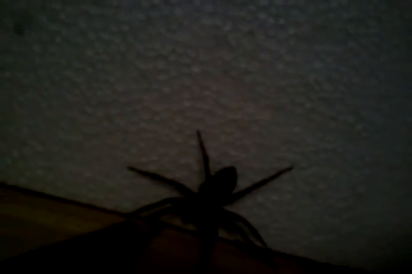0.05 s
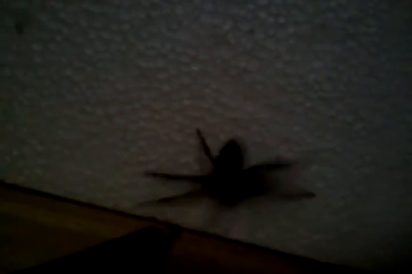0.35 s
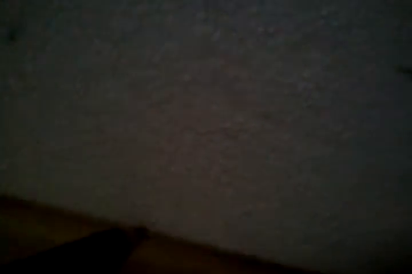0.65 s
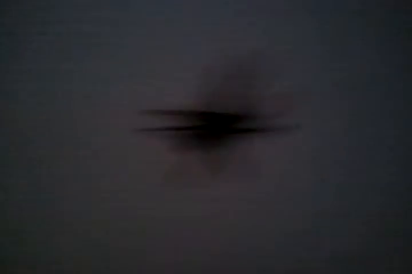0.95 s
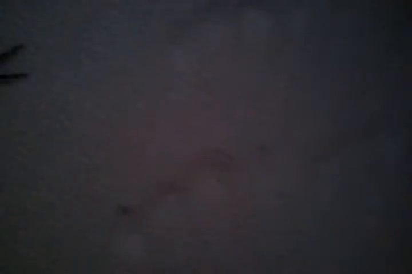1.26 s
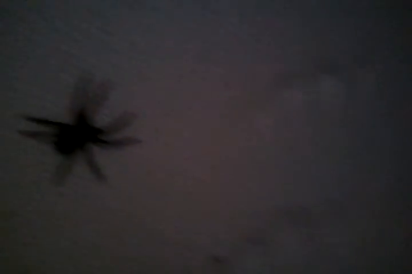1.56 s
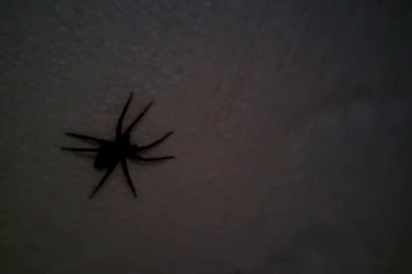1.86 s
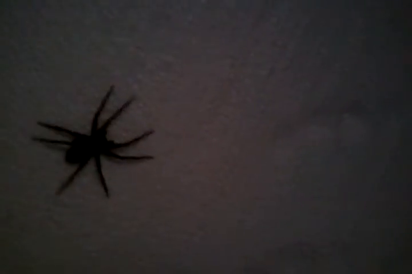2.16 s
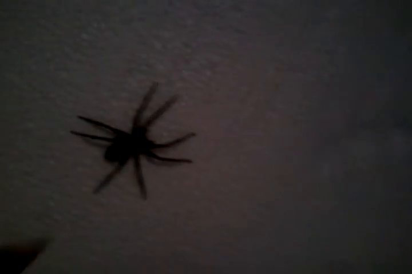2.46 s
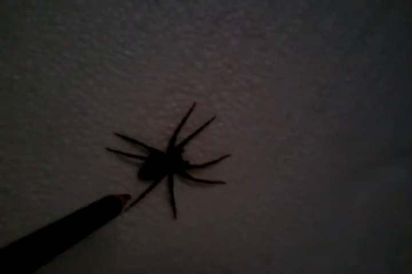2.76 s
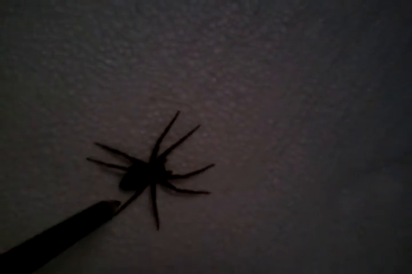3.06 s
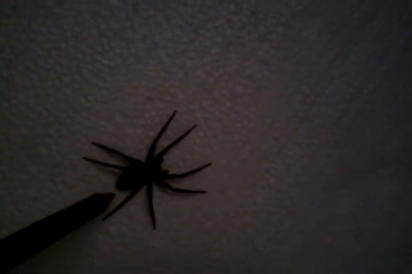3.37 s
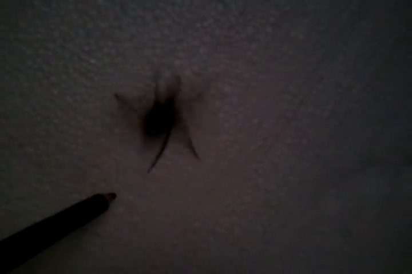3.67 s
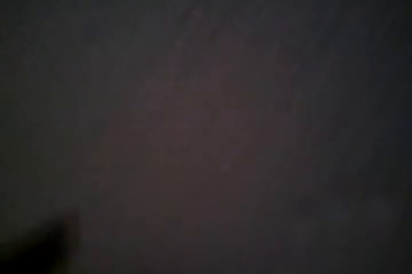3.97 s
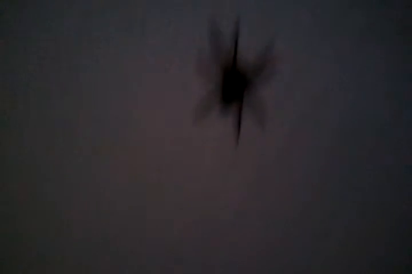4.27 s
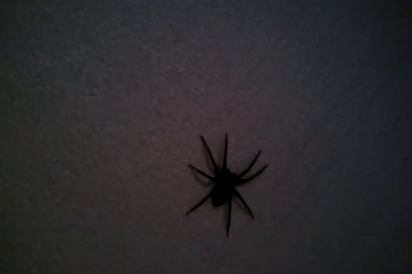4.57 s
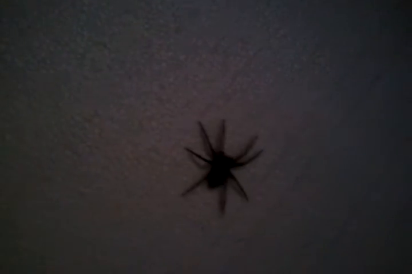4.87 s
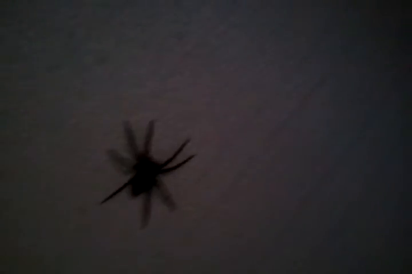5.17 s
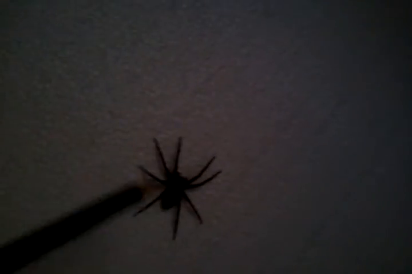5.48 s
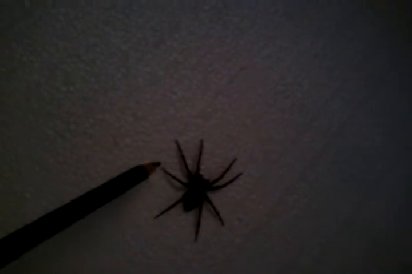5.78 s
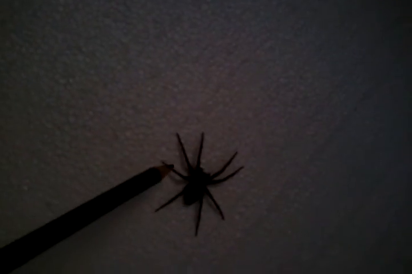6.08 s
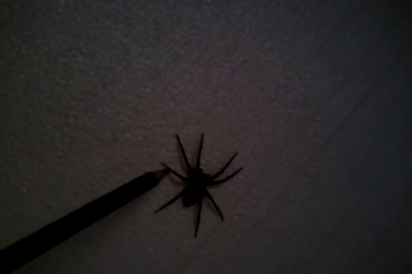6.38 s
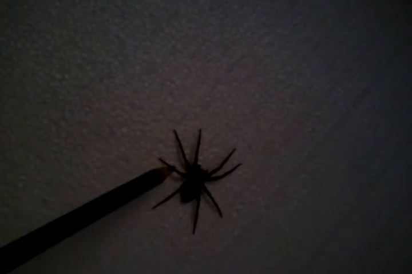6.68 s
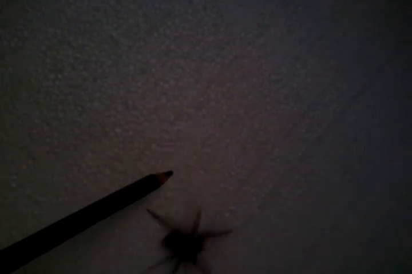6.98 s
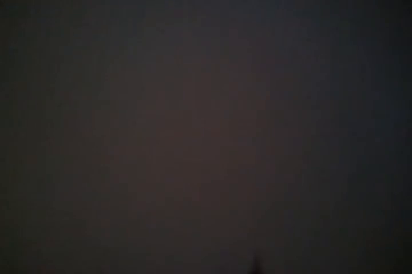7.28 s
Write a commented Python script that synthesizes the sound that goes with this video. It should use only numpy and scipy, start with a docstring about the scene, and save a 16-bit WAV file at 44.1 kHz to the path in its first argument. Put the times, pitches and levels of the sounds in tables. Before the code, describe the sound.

Faint ticking and scraping of a spider dashing over a papered wall three times, between soft microphone knocks, sleeve rustle and hiss.

```python
"""A quiet room rumbles under steady microphone hiss, and a hand-held camera clicks softly.
At 0.6 s a large spider, prodded with a pencil, dashes over textured wallpaper: its claws tick and
scrape, and the paper rings faintly. Fingers bump the camera and a sleeve rustles as the arm moves.
A second dash comes at 3.9 s, followed by more rustle and low bumps. The third starts at 7.1 s
and ends among camera knocks and a brief swell of the room."""
import sys
import numpy as np
from scipy import signal
from scipy.fft import rfft, irfft, next_fast_len
from scipy.io import wavfile

SR = 44100
rng = np.random.default_rng(int(sys.argv[2]) if len(sys.argv) > 2 else 0)


def master_out(mix):
    """Clip the mix to full scale and print it as 16-bit PCM to the path in sys.argv[1]."""
    frames = np.transpose(np.atleast_2d(mix))
    ceiling = np.clip(frames, -1, 1)
    pcm = np.round(ceiling * 32767).astype(np.int16)
    wavfile.write(sys.argv[1], SR, pcm)


N = 332073

# Tone of the room's rumble, its air and the microphone's hiss: frequency_hz, gain_db
RUMBLE_EQ = [(10, -30), (18, -3), (28, 1.5), (45, -1.5), (70, -1), (100, -4), (150, -9), (260, -26),
             (500, -65)]
AIR_EQ = [(60, -6.5), (140, 1), (250, 0.5), (500, -4.5), (1000, -9), (2000, -12.5), (4000, -23.5)]
HISS_EQ = [(100, -2.5), (800, 2.5), (1900, -1.5), (2300, -1.1), (3000, 0.5), (4300, 0), (5500, 0),
           (7000, -0.5), (8500, 1)]
# Gentle swells of rumble and air: middle_s, half_length_s, rise_db
ROOM_SWELLS = [(1.2, .3, 2.5), (2.594, 0.32, 1.5), (4.4, 1.5, 1), (7.5, 0.13, 4)]
# Bumps and clicks of the camera body: start_s, level_db, pitch_hz, t60_s
CAMERA_BUMPS = [(.432, -52, 1530, 0.043), (0.4815, -46, 1510, .05), (.602, -45, 930, 0.022),
                (1.611, -33.5, 64, 0.18), (1.617, -36.5, 151, 0.069), (2.270, -46.5, 129, 0.075),
                (2.274, -42, 347, 0.039), (2.276, -49, 910, .03), (2.6495, -42.5, 835, 0.034),
                (2.650, -51, 1250, 0.023), (5.235, -41.5, 47.6, 0.27), (5.44, -43, 45, 0.4),
                (6.035, -39, 60, 0.12), (7.392, -44, 74, 0.23), (7.432, -37.5, 1091, 0.035),
                (7.433, -42, 640, .035), (7.437, -35.5, 159, 0.093)]
# Firm footfalls: start_s, level_db, scrape_s
FIRM_STEPS = [(.585, -46, .002), (.614, -37.5, 0.0022), (.617, -37.5, .002), (.627, -36.5, .0042),
              (0.633, -34.5, 0.0028), (0.679, -40.5, 0.0021), (.708, -43.5, 0.0036), (.727, -43, 0.0027),
              (.740, -46, .002), (.748, -41.5, .0034), (.770, -45, .0036), (.797, -44, .003),
              (.808, -43, 0.0027), (.812, -37, 0.0023), (0.838, -41, 0.0065), (.844, -41, .003),
              (.865, -42, .002), (.869, -34.5, 0.0017), (0.879, -41, 0.0086), (.900, -41, .0025),
              (0.908, -43.5, .005), (.947, -42, .008), (.974, -41.5, 0.0034), (.981, -36, .0028),
              (.997, -35, 0.0018), (1.0006, -31, .002), (1.0089, -29.5, 0.0019), (1.027, -42.5, 0.0024),
              (1.040, -49, .0035), (1.072, -47, 0.0046), (1.081, -47.5, 0.0086), (1.095, -46, 0.0021),
              (2.258, -47.5, 0.0023), (2.287, -47.5, .002), (3.908, -46, 0.0029), (3.926, -42, 0.0022),
              (3.985, -48, 0.0018), (3.997, -42, 0.0031), (4.032, -47, 0.0029), (4.056, -46, 0.0037),
              (4.094, -39.5, 0.0016), (4.175, -45.5, 0.0026), (4.203, -48, .0018), (4.208, -42, 0.0018),
              (4.273, -47, .0015), (4.328, -47.5, 0.0016), (7.167, -45.5, 0.0063), (7.189, -45.5, 0.007),
              (7.203, -42.5, 0.0043), (7.234, -45, 0.0016), (7.252, -37.5, 0.0013), (7.262, -48, 0.0046),
              (7.275, -43, 0.0015), (7.370, -45, 0.0017), (7.414, -45.5, 0.014), (7.444, -42, .007),
              (7.464, -42, 0.0046), (7.488, -39, 0.0036), (7.518, -45.5, 0.0036)]
# Runs of light leg touches, each on its own patch of wall; the first two make one dash:
# start_s, end_s, touch_level_db, scrape_s, paper_ring_db, wall_tap_db
RUNS = [(.6, 0.798, -52, .003, -12, -11), (0.804, 1.107, -51, .004, -7, -5),
        (3.88, 4.379, -53.5, 0.0029, -2, -7.5), (7.134, 7.53, -51.5, 0.0066, -2, -5.5)]
# Bright tone of a claw on the grain: frequency_hz, gain_db
CLAW_EQ = [(300, -11), (700, -6), (1700, -13.5), (2600, 0), (3400, -1), (4200, -0.5), (5600, -1.5),
           (7200, 0.5), (8200, 0.5), (10000, 6)]
# Resonances of the ringing paper and the dull wall behind it: pitch_hz, width_hz, gain_db
PAPER_MODES = [(2360, 520, 3), (2840, 670, -2), (4410, 300, -7.5), (6600, 270, -2)]
WALL_MODES = [(743, 310, -2.5), (1100, 190, 0.5), (1480, 300, 2), (2360, 400, -4.5)]
# Strokes of the sleeve: middle_s, half_length_s, level_db
SLEEVE_STROKES = [(1.613, 0.0073, -52.5), (2.276, .04, -62), (2.7, 0.18, -68), (4.404, 0.27, -61.5),
                  (5.52, 0.21, -56.5)]
# Tone of sliding cloth: frequency_hz, gain_db
CLOTH_EQ = [(150, -6), (350, -0.5), (800, 5), (1300, 0), (2200, -2.5), (4000, -2), (6000, -1.5),
            (8500, -5.5)]
# Treble roll-off of the camera's microphone: frequency_hz, gain_db
MIC_EQ = [(7400, 0.5), (7800, -3.5), (8200, -8.5), (8500, -17), (8800, -27.5), (9100, -45.5)]

TOP_HZ = 9150  # hard high cut
TOUCHES_PER_S = 70  # light touches of all eight legs
RING_LOSS_DB, CLEAN_TAP_S = 5, .0024  # paper ring lost per doubling of a scrape beyond a clean tap


def amp(db):
    """Decibels to gain."""
    return 10 ** (np.asarray(db) / 20)


def unit(x):
    """Scale to rms 1."""
    return x / np.sqrt(np.mean(np.abs(x) ** 2) + 1e-20)


def eq_gain(curve, hz):
    """Gain of an EQ curve, its points joined on a log frequency axis."""
    points_hz, db = np.transpose(curve)
    return amp(np.interp(np.log(hz + 1), np.log(points_hz + 1), db))


def resonances(modes, hz):
    """Summed response of band-pass resonators of alternating polarity."""
    return sum((-1) ** k * amp(db) * 1j * hz * width / (pitch * pitch - hz * hz + 1j * hz * width)
               for k, (pitch, width, db) in enumerate(modes))


def colour(x, response, table):
    """Filter x by a table's EQ curve or resonances, with the high cut."""
    size = next_fast_len(len(x) + SR // 8)
    hz = np.fft.rfftfreq(size, 1 / SR)
    return irfft(rfft(x, size) * response(table, hz) * (hz < TOP_HZ), size)[:len(x)]


def noise(curve):
    """A bed of coloured noise, rms 1."""
    return unit(colour(rng.standard_normal(N), eq_gain, curve))


def swell(middle_s, half_length_s):
    """A bell-shaped fade in and out."""
    t = np.arange(N) / SR
    return np.exp(-.5 * ((t - middle_s) / half_length_s) ** 2)


def add(track, start_s, sound):
    """Mix a sound into the track."""
    part = track[max(round(start_s * SR), 0):][:len(sound)]
    part += sound[:len(part)]


def room_tone(rumble_db=-58, air_db=-58.5, hiss_db=-59):
    """Low rumble and room air swell gently under the even hiss of the microphone."""
    swell_db = sum(db * swell(middle, half) for middle, half, db in ROOM_SWELLS)
    room = amp(rumble_db) * noise(RUMBLE_EQ) + amp(air_db) * noise(AIR_EQ)
    return amp(swell_db) * room + amp(hiss_db) * noise(HISS_EQ)


def camera_handling(roughness=.3):
    """Fingers shift on the camera: each bump rings one damped, slightly unsteady mode."""
    body, t = np.zeros(N), np.arange(SR // 3) / SR
    for start_s, db, hz, t60_s in CAMERA_BUMPS:
        phase_drift = roughness * np.cumsum(rng.standard_normal(len(t))) * np.sqrt(hz / SR)
        envelope = amp(db - 60 * t / t60_s) * (1 - np.exp(-2 * t * hz))
        add(body, start_s, envelope * np.sin(2 * np.pi * hz * t + phase_drift))
    return body


def grit(size, spread_db):
    """Tiny slips of very uneven strength, rms 1."""
    return unit(rng.standard_normal(size) * amp(spread_db * rng.standard_normal(size)))


def footfall(scrape_s, ring_db, tap_db, tail_db=-16, tail_t60_s=.048, attack_s=.00016):
    """A claw catches on the grain in a short run of slips that shake paper and wall."""
    t = np.arange(SR // 16) / SR
    grip = np.exp(-(t / scrape_s) ** 2) + amp(tail_db - 60 * t / tail_t60_s)
    grip *= 1 - np.exp(-t / attack_s)
    claw = unit(colour(grip * grit(len(t), spread_db=3), eq_gain, CLAW_EQ))
    paper = unit(colour(grip * grit(len(t), spread_db=3), resonances, PAPER_MODES))
    wall = unit(colour(grip * grit(len(t), spread_db=3), resonances, WALL_MODES))
    tick = claw + amp(ring_db) * paper + amp(tap_db) * wall
    return unit(tick) * np.sqrt(np.mean(grip ** 2))


def spider(step_boost_db=1, scatter_db=3.5, stumble=.4):
    """Firm footfalls over a quick, uneven patter of the other legs; the patch of wall colours both."""
    feet, runs = np.zeros(N), np.array(RUNS)
    for start_s, db, scrape_s in FIRM_STEPS:
        distance_s = np.abs(np.clip(start_s, runs[:, 0], runs[:, 1]) - start_s)
        *_, ring_db, tap_db = runs[np.argmin(distance_s)]  # the nearest run sets the tone
        damping_db = RING_LOSS_DB * np.log2(max(scrape_s / CLEAN_TAP_S, .5))
        add(feet, start_s, amp(db + step_boost_db) * footfall(scrape_s, ring_db - damping_db, tap_db))
    for start_s, end_s, db, scrape_s, ring_db, tap_db in RUNS:
        for beat_s in np.arange(start_s, end_s, 1 / TOUCHES_PER_S):
            late, weight = rng.standard_normal(2)
            touch = amp(db + scatter_db * weight) * footfall(scrape_s, ring_db, tap_db)
            add(feet, beat_s + stumble * late / TOUCHES_PER_S, touch)
    return feet


def room_echo(x, wet_db=-14, t60_s=.099, predelay_s=.004):
    """The small room answers with a short diffuse tail."""
    t = np.arange(SR // 3) / SR
    tail = rng.standard_normal(len(t)) * amp(-60 * t / t60_s) * (t > predelay_s)
    return amp(wet_db) * signal.fftconvolve(x, tail / np.linalg.norm(tail))[:N]


def sleeve():
    """Cloth slides in soft swells as the arm moves."""
    return noise(CLOTH_EQ) * sum(amp(db) * swell(middle, half) for middle, half, db in SLEEVE_STROKES)


def scene():
    """Mono mix of room, camera, sleeve and spider, with echo on the feet alone."""
    backdrop = room_tone() + camera_handling() + sleeve()
    feet = spider()
    return (backdrop + feet + room_echo(feet))[None]


def record(dry):
    """The camera rolls off the treble and adds a small DC offset."""
    dc_offset = .0043
    return colour(dry[0], eq_gain, MIC_EQ)[None] + dc_offset


dry = scene()
out = record(dry)
master_out(out)
```